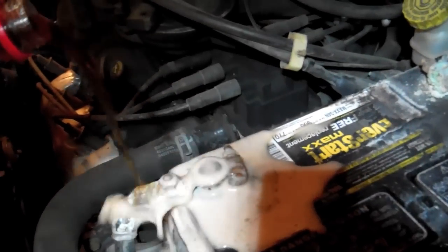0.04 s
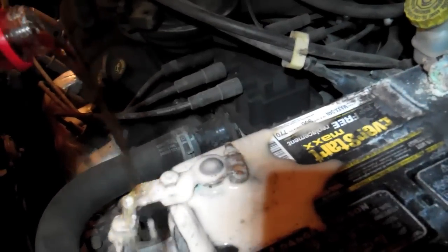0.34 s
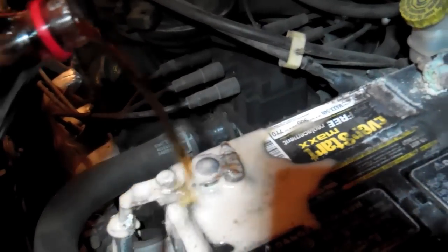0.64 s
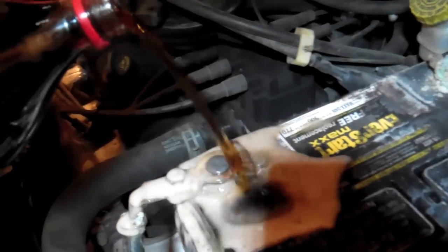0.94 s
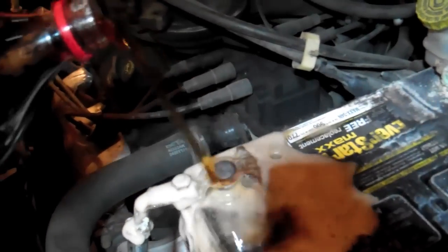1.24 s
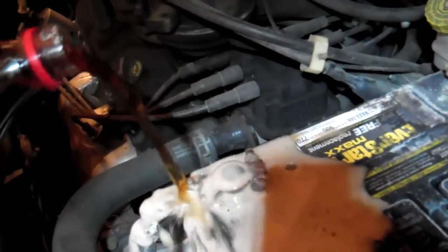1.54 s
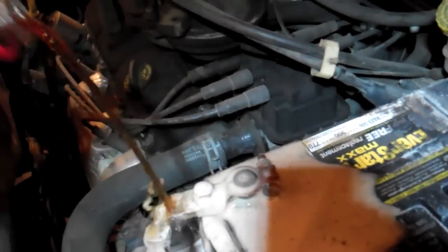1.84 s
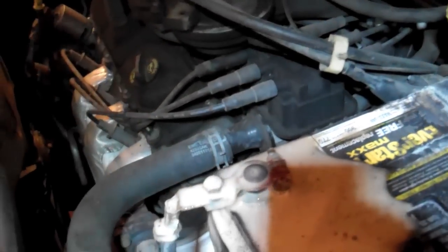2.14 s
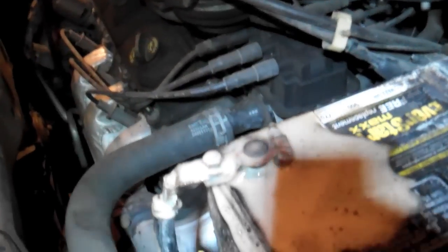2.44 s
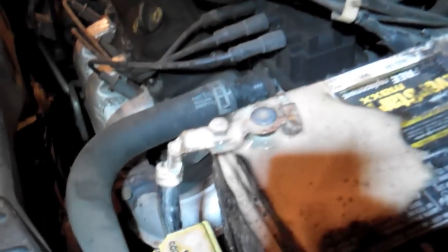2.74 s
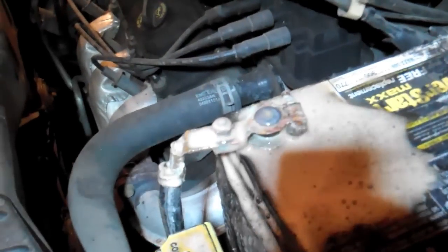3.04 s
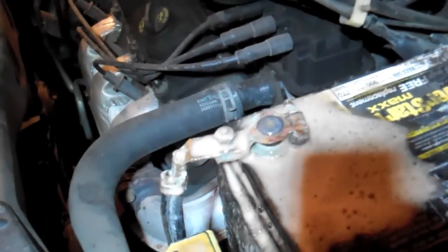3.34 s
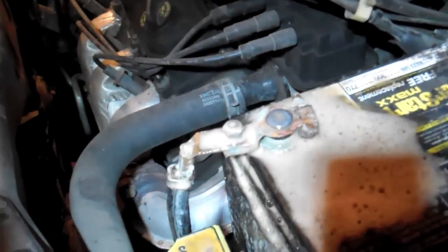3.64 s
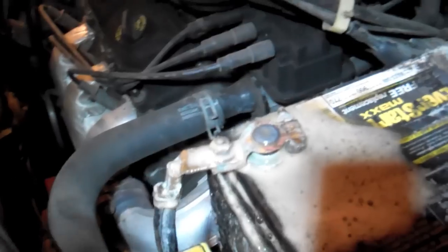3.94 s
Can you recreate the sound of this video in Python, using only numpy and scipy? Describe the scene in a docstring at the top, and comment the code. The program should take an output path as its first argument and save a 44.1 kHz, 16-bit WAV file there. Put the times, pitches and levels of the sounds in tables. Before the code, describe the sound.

Cola fizzes and splashes onto a car battery, leaving hissing foam and faint drips.

```python
"""Cola poured over a car battery

Close up, in stereo. For two seconds the stream spatters on the battery and air gulps into the bottle,
while countless tiny bubbles burst. Then the foam settles into a duller hiss and the run-off drums
faintly on a panel below. A low mains hum lies underneath, and at the end something hollow is knocked."""
import sys
import numpy as np
from scipy import signal
from scipy.fft import rfft, irfft
from scipy.io import wavfile
from scipy.ndimage import uniform_filter1d

SR = 44100
rng = np.random.default_rng(int(sys.argv[2]) if len(sys.argv) > 2 else 0)


def store_wav(level_fs):
    """Save 16-bit WAV to argv[1]."""
    pcm = np.round(np.clip(np.atleast_2d(level_fs), -1, 1) * 32767)
    wavfile.write(sys.argv[1], SR, pcm.T.astype(np.int16))


N = 176400


def undb(db):
    """Decibels to amplitude."""
    return 10 ** (np.asarray(db) / 20)


def unit(x):
    """Scale to rms 1."""
    return x / np.sqrt(np.mean(x ** 2) + 1e-20)


def clock(samples=N):
    """Sample times in seconds."""
    return np.arange(samples) / SR


def over_hz(points):
    """Spread a table of (frequency [Hz], value) over the bins of a spectrum."""
    hz, value = np.array(points, float).T
    bin_hz = np.arange(N // 2 + 1) * SR / N
    return np.interp(np.log(bin_hz + 1), np.log(hz), value)


def colour(x, points):
    """Filter by a table of (frequency [Hz], level [dB]), to rms 1."""
    return unit(irfft(rfft(x) * undb(over_hz(points)), N))


def band(x, hz, width):
    """One resonance, gain 1 at its centre."""
    return signal.lfilter(*signal.iirpeak(hz, hz / min(width, SR / 4), fs=SR), x)


def walk(per_s):
    """A smooth random wander of rms 1."""
    hold = int(SR / per_s)
    steps = np.repeat(rng.standard_normal(N // hold + 1), hold)
    return unit(uniform_filter1d(steps, hold)[:N])


def add(out, start, sound):
    """Mix a sound in at a time in seconds."""
    i = int(np.clip(start * SR, 0, N - 1))
    out[i:i + len(sound)] += sound[:N - i]


def bubble(hz, cycles, glide=.03):
    """A ring that rises in pitch while it dies by 60 dB over its cycles."""
    age = np.arange(int(cycles / hz * SR) + 2) * hz / SR / cycles
    return np.sin(2 * np.pi * cycles * age * (1 + glide * age)) * np.exp(-np.log(1000) * age)


def burst(hz, width, rise_s, fade_s):
    """A shower of tiny impacts, heard as a quickly fading band of noise."""
    t = clock(SR // 5)
    noise = unit(band(band(rng.standard_normal(len(t)), hz, width), hz, width))
    return noise * (1 - np.exp(-t / rise_s)) * np.exp(-t / fade_s)


def pops(per_s, spread_db):
    """Random impulses, many small and a few large."""
    impulses = (rng.random(N) < per_s / SR) * np.sign(rng.standard_normal(N))
    return unit(impulses * undb(spread_db * rng.standard_normal(N)))


def widen(shared, apart):
    """Spread a source over both microphones, most alike around 3 kHz."""
    # likeness of left and right (frequency [Hz], correlation [0-1])
    likeness = [(100, 0.12), (600, 0.2), (1500, 0.6), (3000, 0.78), (6000, 0.55), (9000, 0.33),
                (13000, 0.36)]
    alike = over_hz(likeness)
    mid = rfft(shared) * np.sqrt(1 + alike)
    side = rfft(apart) * np.sqrt(1 - alike)
    return irfft(np.array([mid + side, mid - side]), N)


def fizz():
    """Bubbles burst by the thousand: bright and surging in fresh cola, duller and smoother in foam."""
    # course of the fizz (time [s], fresh cola level [dB], settled foam level [dB])
    levels = [(0, -48, -50.5), (.5, -46.5, -58.5), (1.2, -47.5, -52.5), (1.55, -47, -49.5),
              (1.9, -45.5, -51), (2.2, -46.5, -51), (2.55, -48.5, -48.5), (3.0, -49, -46), (3.5, -57, -45),
              (4, -74, -44.5)]
    # spectrum of bubbles bursting in fresh cola (frequency [Hz], level [dB])
    fresh_spectrum = [(150, -7), (700, -7), (1400, -6.5), (2100, -3.5), (3000, 0), (4200, -1.5), (6000, 0),
                      (8400, -0.5), (10000, -5), (11300, -11), (12300, -17), (13500, -75)]
    # spectrum of bubbles bursting in settled foam (frequency [Hz], level [dB])
    foam_spectrum = [(150, -17), (700, -9), (1600, -8), (2300, -3.5), (3300, -2.5), (5000, 0), (6800, -3.5),
                     (8900, -7.5), (10200, -13.5), (11600, -19.5), (12400, -35), (13500, -60)]
    # fresh cola foams up where it lands (time [s], level against its steady fizz [dB])
    surges = [(.225, 3), (.25, 2), (.35, -3), (0.599, 3.5), (1.02, -15), (1.495, 3), (1.632, -4),
              (1.652, 0), (2.068, 3.5), (2.105, 1)]
    fresh_per_s, foam_per_s, spread_db = 14000, 22000, 3
    rise_s, fade_s, flutter_db, tinkle_db = .00074, .013, .97, -11
    fresh = colour(widen(pops(fresh_per_s, spread_db), pops(fresh_per_s, spread_db)), fresh_spectrum)
    foam = colour(widen(pops(foam_per_s, spread_db), pops(foam_per_s, spread_db)), foam_spectrum)
    t, surge_power = clock(), np.ones(N)
    swell = (1 - np.exp(-t / rise_s)) * np.exp(-t / fade_s)
    for start, db in surges:
        add(surge_power, start, undb(db) ** 2 * swell)
    at, fresh_db, foam_db = np.array(levels).T
    fresh_gain = undb(np.interp(t, at, fresh_db) + flutter_db * walk(per_s=30))
    foam_gain = undb(np.interp(t, at, foam_db))
    rings = undb(tinkle_db) * np.hypot(fresh_gain, foam_gain) * tinkle()
    return fresh * np.sqrt(surge_power) * fresh_gain + foam * foam_gain + rings


def tinkle():
    """Larger bubbles ring as they burst in clusters of six, scattered between left and right."""
    low_hz, high_hz = 3600, 9500
    clusters_per_s, mean_delay_s, spread_db = 90, .007, 2.2
    out = np.zeros((2, N))
    for start in rng.random(int(clusters_per_s * N / SR)) * N / SR:
        for delay, pitch, softness, leftward in rng.random((6, 4)):
            hz = low_hz * (high_hz / low_hz) ** pitch
            ring = undb(-spread_db * np.log(softness + .03)) * bubble(hz, cycles=30)
            at = start - mean_delay_s * np.log(1 - delay)
            add(out[0], at, np.sqrt(leftward) * ring)
            add(out[1], at, np.sqrt(1 - leftward) * ring)
    return unit(out)


def background():
    """The tone of the place: a slightly wavering mains hum over faint, dull air noise."""
    # spectrum of the surrounding air (frequency [Hz], level [dB])
    air_spectrum = [(20, 15), (35, 1), (70, 8.5), (180, 4.5), (400, 3.5), (900, 2.5), (2500, -31)]
    hum_hz, hum_db, air_db = 119.6, -69, -63
    air = colour(widen(*rng.standard_normal((2, N))), air_spectrum)
    hum = np.sqrt(2) * np.sin(2 * np.pi * hum_hz * clock()) * (1 + .2 * walk(per_s=5))
    return undb(air_db) * air + undb(hum_db) * hum


def spatter():
    """Each drop ticks, rings for a few milliseconds and throws a little spray; too small for bass."""
    # drops striking the battery (time [s], level [dB], pitch [Hz], ring length [cycles])
    drops = [(0.0249, -27, 2780, 7.4), (.1714, -36, 2590, 8), (0.229, -33, 2520, 8.8),
             (0.2383, -27, 2880, 11), (0.246, -24, 3240, 10), (.252, -41, 2300, 12), (0.312, -30, 2500, 11),
             (.5309, -30, 3280, 34), (.563, -23.5, 2860, 8.7), (0.567, -33, 2400, 21),
             (0.6882, -32, 1980, 14), (0.847, -37.5, 2080, 12), (0.917, -30, 3260, 18),
             (1.0217, -37, 2600, 8), (1.0433, -31.5, 3320, 24), (1.151, -38.5, 2480, 18),
             (1.16, -28, 2670, 8.2), (1.1902, -38, 4700, 28), (1.3868, -30, 8000, 11),
             (1.4023, -29.5, 3500, 22), (1.41, -36, 3000, 24), (1.418, -29, 3230, 17),
             (1.4506, -24.5, 3050, 18), (1.4538, -28, 4500, 7.7), (1.4578, -32.5, 2080, 12),
             (1.4578, -24, 4960, 8.4), (1.4634, -32.5, 2100, 18), (1.503, -33, 4640, 32),
             (1.5236, -28.5, 2900, 7.9), (1.5238, -33, 8400, 36), (1.6302, -28, 6040, 21),
             (1.637, -32, 5300, 16), (1.6436, -33, 6200, 20), (1.655, -33, 4300, 15),
             (1.658, -34, 6800, 22), (1.9552, -34, 4550, 22), (2.07, -34, 3700, 17),
             (2.1103, -34, 2880, 18), (2.1129, -28, 3180, 14)]
    tick_db, spray_db = -6.5, -17
    out = np.zeros(N)
    for at, db, hz, cycles in drops:
        add(out, at, undb(db) * bubble(hz, cycles))
        add(out, at, undb(db + tick_db) * bubble(hz=5800, cycles=9.5, glide=0))
        add(out, at, undb(db + spray_db) * burst(hz, width=.7 * hz, rise_s=.0004, fade_s=.0035))
    return signal.sosfilt(signal.butter(2, 1300, "highpass", fs=SR, output="sos"), out)


def splashes():
    """Heavier splashes of cola plop and scatter."""
    # cola landing (time [s], level [dB], centre [Hz], fade [s], width [share of the centre])
    landings = [(.229, -46.5, 1600, .012, 1.1), (.246, -43.5, 1450, 0.0099, 1.6),
                (.247, -43, 4500, 0.009, 1.1), (0.3119, -40.5, 960, 0.0073, 1.2),
                (.632, -46, 800, 0.0067, 1.1), (.69, -51.5, 1940, .025, .7), (.982, -42, 1000, 0.015, 0.51),
                (0.986, -42, 1600, 0.013, 0.8), (1.368, -45, 1110, 0.008, 0.64),
                (1.542, -44, 1110, 0.0065, 1), (1.653, -40.5, 6400, 0.0054, 0.43),
                (1.713, -41.5, 1700, 0.012, 0.98), (1.722, -47, 1010, 0.018, 0.73),
                (2.031, -47.5, 1500, 0.022, 0.88), (2.071, -46, 1200, 0.019, 1.2),
                (2.308, -48.5, 1040, 0.01, 0.58), (3.704, -41, 1250, 0.0067, 0.7)]
    out = np.zeros(N)
    for at, db, hz, fade_s, width in landings:
        add(out, at, undb(db + 1) * bubble(hz, cycles=7))
        add(out, at, undb(db) * burst(hz, hz * width, rise_s=.0014, fade_s=fade_s))
    return out


def gulps():
    """Air gulps softly into the bottle, each bubble a low, rising note."""
    # air bubbles entering the bottle (time [s], level [dB], pitch [Hz])
    air_bubbles = [(0.311, -48.5, 228), (0.739, -53.5, 171), (1.338, -59, 141), (1.765, -53, 214)]
    out = np.zeros(N)
    for at, db, hz in air_bubbles:
        add(out, at, undb(db) * bubble(hz, cycles=21, glide=.06))
    return out


def runoff():
    """A dribble drums on a panel below the battery; now and then a fat drip rings it."""
    # resonances of the panel (frequency [Hz], width [Hz], level [dB])
    panel = [(556, 77, -5), (824, 36, -6), (947, 28, -1), (998, 41, -4), (1166, 105, -7), (1440, 95, -11.5)]
    # course of the dribble (time [s], level [dB])
    flow = [(0, -93), (2.5, -67), (2.7, -65), (2.92, -66), (3.03, -60), (3.3, -58.5), (3.6, -60.5),
            (4, -57.5)]
    # single fat drips (time [s], level [dB])
    drips = [(2.654, -47), (2.856, -49.5), (3.011, -46.5), (3.117, -49), (3.262, -47), (3.29, -48),
             (3.447, -44.5), (3.639, -49.5), (3.684, -44.5)]
    hits = pops(per_s=320, spread_db=2.5)
    dribble = sum(undb(db) * band(hits, hz, width) for hz, width, db in panel)
    out = unit(dribble) * undb(np.interp(clock(), *np.array(flow).T))
    t = clock(SR // 5)
    ring = sum(undb(db) * np.sin(2 * np.pi * hz * t) * np.exp(-np.pi * width * t)
               for hz, width, db in panel)
    for at, db in drips:
        add(out, at, undb(db - 3) * ring)
    return out


def knock():
    """A few quick contacts ring a hollow body, with a rattle and one sharp snap."""
    # contacts within the knock (time [s], level [dB])
    contacts = [(3.9621, -8), (3.9674, -1.5), (3.9703, 3.5), (3.9736, -0.5), (3.9883, -10)]
    # modes of the hollow body (frequency [Hz], level [dB], time to fall 60 dB [s])
    modes = [(194, 0.5, 0.13), (344, -7.5, 0.07), (485, 2, 0.061), (570, -23, 0.029), (720, -6.5, 0.02),
             (835, -9, 0.02), (1060, -19, .04), (1410, -18, 0.027), (1630, -10, 0.03), (1850, -15, 0.02),
             (2650, -11, 0.016), (4500, -8, 0.018)]
    ring_db, rattle_db, snap_db, snap_at_s = -30.5, -38.5, -20.5, 3.9713
    t, out = clock(SR // 5), np.zeros(N)
    ring = sum(undb(db) * np.sin(2 * np.pi * hz * t) * np.exp(-np.log(1000) * t / t60)
               for hz, db, t60 in modes)
    for at, db in contacts:
        rattle = burst(hz=870, width=1700, rise_s=.0008, fade_s=.018)
        add(out, at, undb(db) * (undb(ring_db) * ring + undb(rattle_db) * rattle))
    out = signal.sosfilt(signal.butter(2, [106, 5000], "bandpass", fs=SR, output="sos"), out)
    add(out, snap_at_s, undb(snap_db) * bubble(hz=8560, cycles=26, glide=0))
    return out


def bay(x):
    """Direct sound and brief, dense reflections from the parts around the battery."""
    t60_s, build_s, reflections_db = .05, .0037, -10
    t = clock(SR // 6)
    tail = band(rng.standard_normal((2, len(t))), hz=3300, width=6700)
    tail *= np.exp(-np.log(1000) * t / t60_s) * (1 - np.exp(-t / build_s))
    tail /= np.sqrt(np.sum(tail ** 2, axis=1, keepdims=True))
    return x + undb(reflections_db) * signal.fftconvolve(x[None], tail, axes=1)[:, :N]


def lean_left(db):
    """Left and right gains that put the left ahead by so many decibels."""
    return undb(np.array([[.5], [-.5]]) * db)


def scene():
    """Close to the battery: the fizz wide, the pour in the middle, the knock a little to the left."""
    cola = fizz() + bay(spatter() + splashes() + gulps() + runoff())
    return cola + lean_left(db=1.5) * bay(knock()) + background()


def record(dry):
    """The left microphone hears more treble; the top is cut steeply at 13 kHz."""
    # balance of the microphones (frequency [Hz], left over right [dB])
    balance = [(100, 1), (400, 2), (1500, 1.4), (4000, 2.5), (6000, 2.5), (8500, 6.5), (10500, 3),
               (12000, -1.5)]
    leaned = irfft(rfft(dry) * lean_left(over_hz(balance)), N)
    return signal.sosfilt(signal.ellip(8, .2, 70, 13000, fs=SR, output="sos"), leaned)


dry = scene()
out = record(dry)
store_wav(out)
```